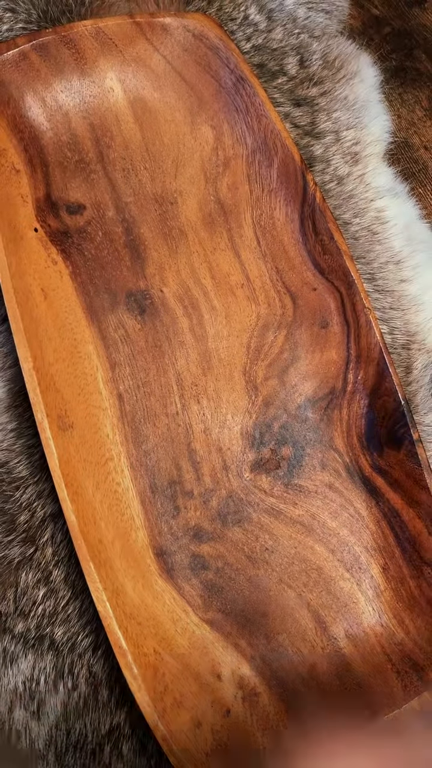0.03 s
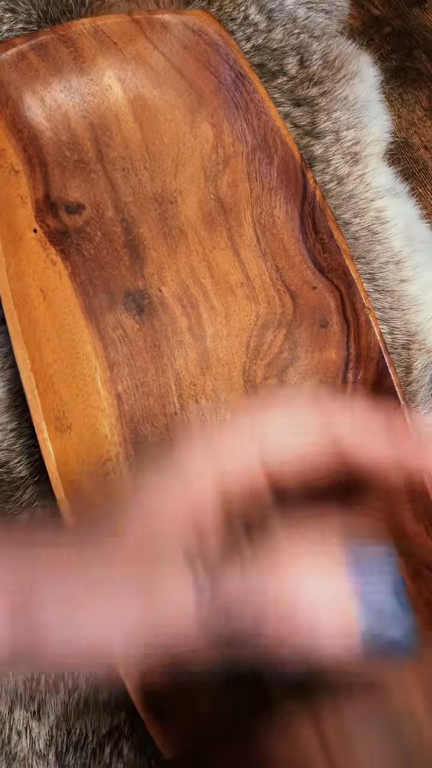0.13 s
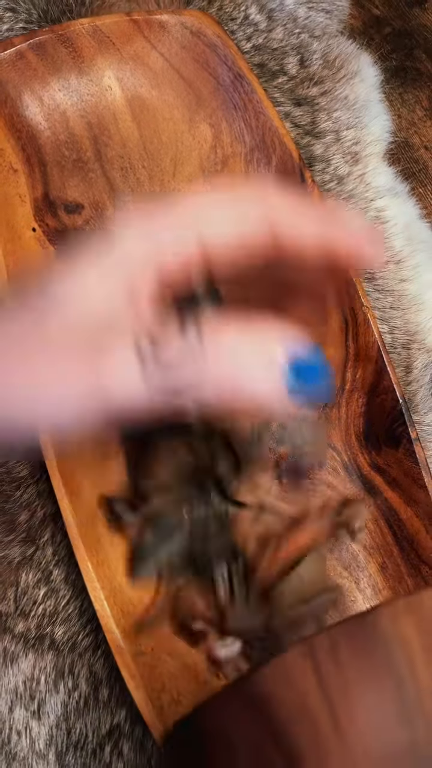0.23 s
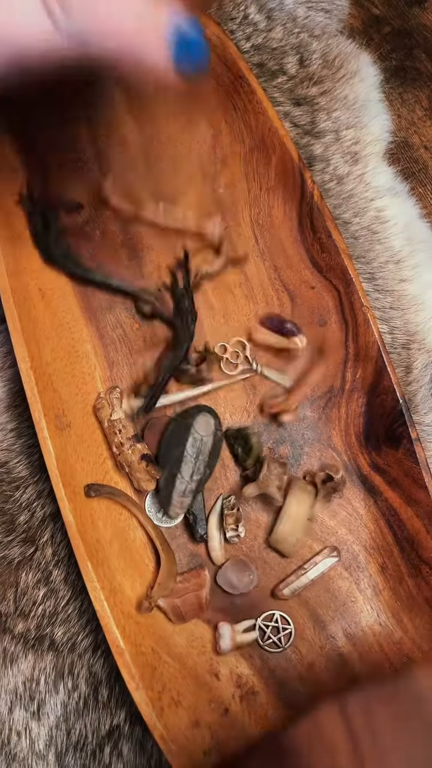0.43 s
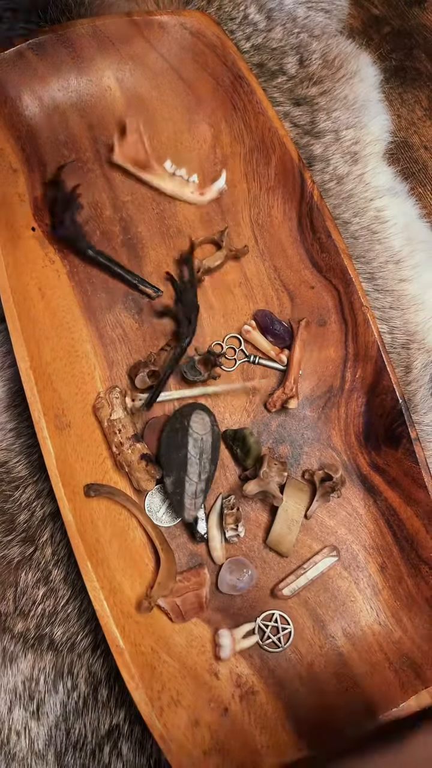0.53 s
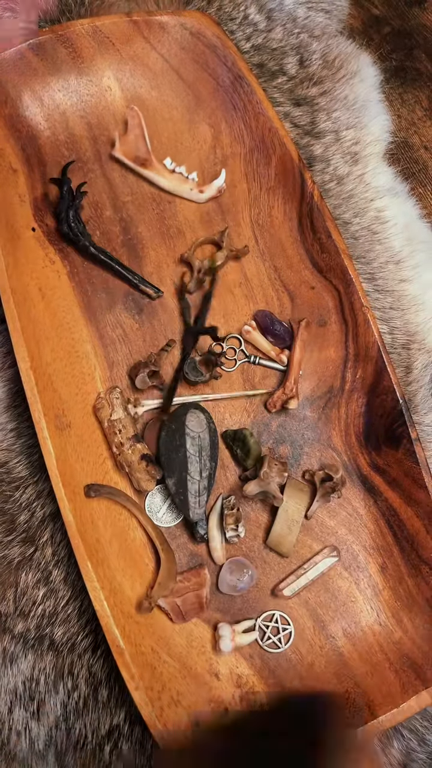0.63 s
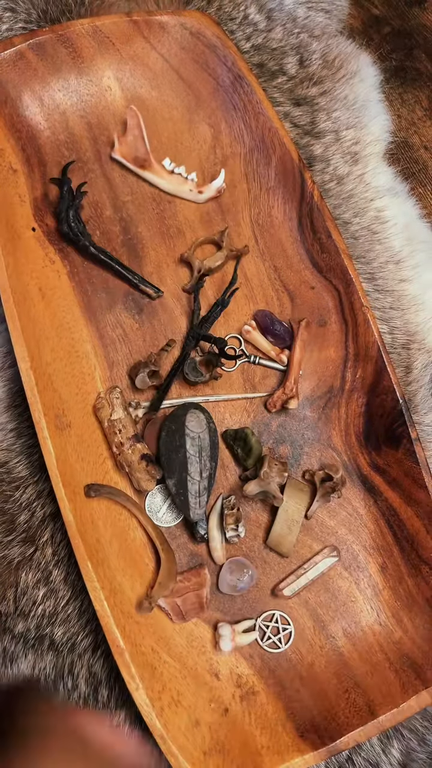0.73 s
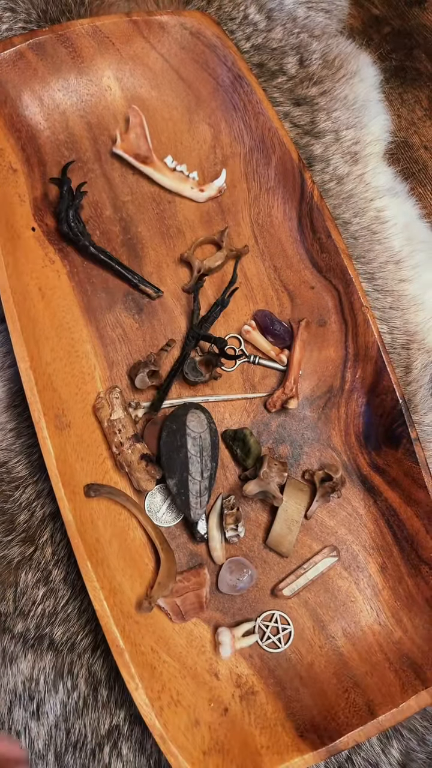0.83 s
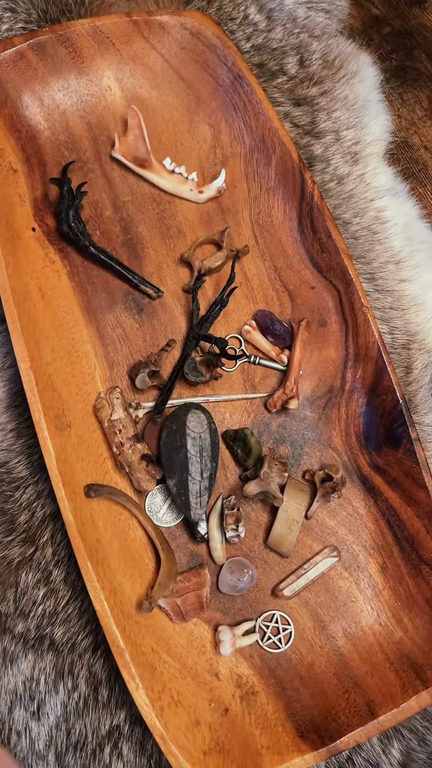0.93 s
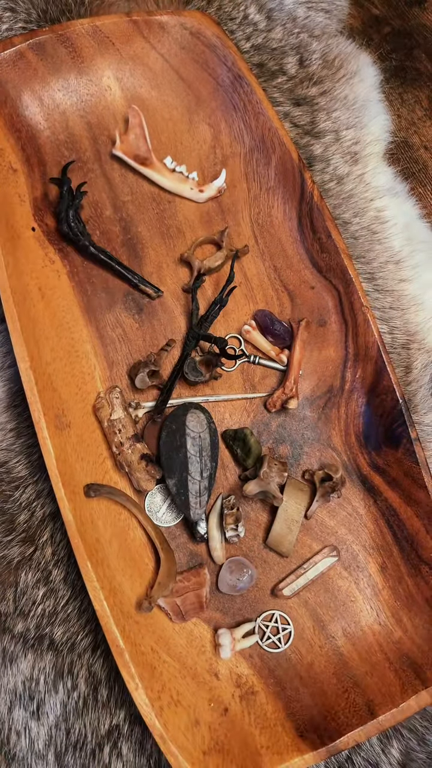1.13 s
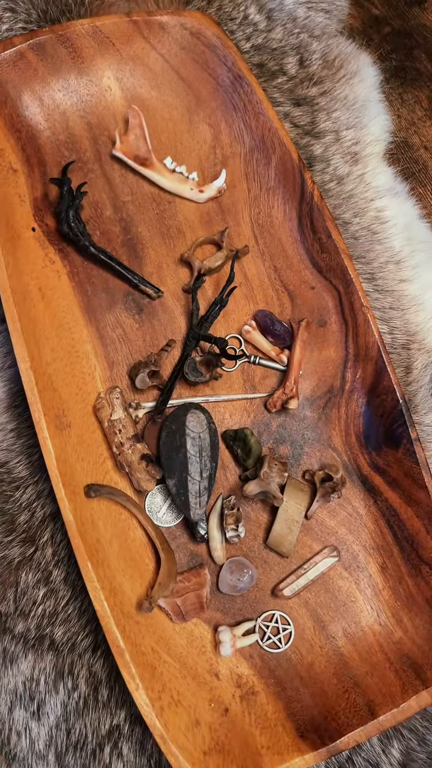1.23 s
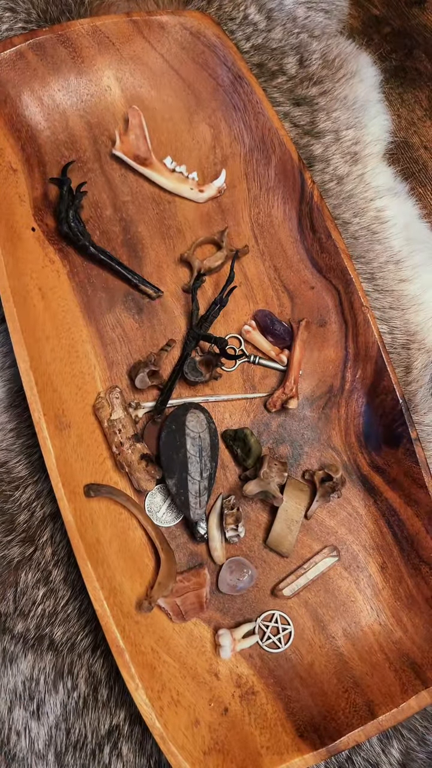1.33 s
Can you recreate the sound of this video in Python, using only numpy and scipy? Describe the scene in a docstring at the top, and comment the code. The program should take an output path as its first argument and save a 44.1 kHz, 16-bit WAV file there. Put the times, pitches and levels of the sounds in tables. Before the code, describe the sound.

Close up in a small room, a cupful of hard little pieces spills across wood with rattling clicks and a brief metallic chink, followed by a sharp cup knock, two softer knocks and a faint brush of fur.

```python
"""Small bones, stones and metal charms are tipped from a wooden cup onto a wooden tray, heard close by.
From 0.03 s pieces clack (damped tones, noise cracks); bounces rattle, metal chinks, the tray thuds low.
By 0.8 s they have thinned out. At 0.98 s the cup is set down hard (damped modes), then knocks softly.
After the landing, from 1.0 s, a hand brushes fur in uneven swells until the end (shaped noise).
A small room answers (noise tails); faint air noise throughout.
"""
import sys
import numpy as np
from scipy import signal
from scipy.fft import rfft, irfft, next_fast_len
from scipy.io import wavfile

SR = 44100
rng = np.random.default_rng(int(sys.argv[2]) if len(sys.argv) > 2 else 0)


def dump(signal):
    """Clip the signal to [-1, 1] and save it as 16-bit WAV at the path in sys.argv[1]."""
    limited = np.clip(np.atleast_2d(signal).T, -1, 1)
    pcm = np.round(limited * 32767).astype(np.int16)
    wavfile.write(sys.argv[1], SR, pcm)


N = 61739  # length [samples]


def amp(db):
    """Decibels to linear gain."""
    return 10 ** (np.asarray(db) / 20)


def unit(x):
    """Scale to rms 1."""
    return x / np.sqrt(np.mean(x ** 2) + 1e-20)


def along(points, hz):
    """Interpolate (frequency [Hz], value) points on a log frequency axis."""
    f, v = np.transpose(points)
    return np.interp(np.log(hz + 1), np.log(f + 1), v)


def level(rows):
    """Gain per sample of a (time [s], level [dB]) curve, -120 dB outside."""
    s, db = np.transpose(rows)
    return amp(np.interp(np.arange(N) / SR, s, db, -120, -120))


def filtered(x, response):
    """Multiply the spectrum of x by a response of frequency."""
    m = next_fast_len(N + 8192)
    hz = np.fft.rfftfreq(m, 1 / SR)
    return irfft(rfft(x, m) * response(hz), m)[..., :N]


def dulled(x, corner_hz):
    """Two-pole roll-off of the treble."""
    return filtered(x, lambda hz: 1 / (1 + 1j * hz / corner_hz) ** 2)


def noise(spectrum):
    """Coloured noise of rms 1."""
    return unit(filtered(rng.standard_normal(N), lambda hz: amp(along(spectrum, hz))))


def place(s, rows):
    """Sum short sounds, one per row, starting at times s."""
    start = np.round(np.asarray(s) * SR).astype(int)[:, None]
    at = start + np.arange(rows.shape[1])
    return np.bincount(at.ravel(), rows.ravel(), N + SR)[:N]


def rings(s, hz, db, t60, attack_s=0.00049, size=4096):
    """Damped sines: exponential decay, smooth exponential onset."""
    t = np.arange(size) / SR
    s, hz, db, t60 = [v.ravel()[:, None] for v in np.broadcast_arrays(s, hz, db, t60)]
    decay = amp(db - 60 * t / t60)
    onset = 1 - np.exp(-t / attack_s)
    return place(s[:, 0], decay * np.sin(2 * np.pi * hz * t) * onset)


def struck(s, db, modes, scatter_db, detune, damping=1, size=4096):
    """Each blow rings all modes anew, with random strengths and slight detuning."""
    hz, mode_db, t60 = np.transpose(modes)
    luck = rng.standard_normal((len(s), 2, len(hz)))
    blow_hz = hz * (1 + detune * luck[:, 0])
    blow_db = np.c_[db] + mode_db + scatter_db * luck[:, 1]
    return rings(np.c_[s], blow_hz, blow_db, t60 * damping, size=size)


# contact noise spectrum: (frequency [Hz], level [dB])
CRACK_COLOUR = [(300, -51), (900, -3), (2500, -5), (5000, -2.5), (8000, -7.5), (11000, -15), (14000, -17.5),
                (16000, -10)]


def cracks(s, db, t60):
    """Contact of hard surfaces: coloured noise bursts with exponential decay."""
    t = np.arange(1024) / SR
    envelope = place(s, amp(np.asarray(db)[:, None] - 60 * t / t60))
    burst = rng.standard_normal(N) * envelope
    return filtered(burst, lambda hz: amp(along(CRACK_COLOUR, hz)))


# single landings: (time [s], level [dB], dull tone [Hz], its level [dB re clack], bright tone [Hz],
# its level [dB re clack], crack level [dB re clack], ring time [factor])
CLACK_ROWS = [(0.033, -46.5, 1030, -19, 2060, -33, -12, 0.69), (0.139, -43.5, 850, 2, 2270, -13, -17, 0.77),
              (0.161, -18.5, 1680, -9.5, 2290, -5.5, -9.5, 0.67),
              (0.183, -38.5, 1010, 3.5, 2420, 11.5, -23.5, 0.62),
              (0.192, -45, 1070, -18, 2310, -13.5, -8.5, 0.9),
              (0.203, -25, 1000, -24, 2290, -9, -9.5, 0.42), (0.216, -4, 1360, -38, 2310, -13.5, -12.5, 1),
              (0.23, -7.5, 1140, -22, 2490, -19, -36, 1), (0.247, 2.5, 1080, -41, 3600, -18, -21.5, 1),
              (0.25, -1.5, 910, -34, 3240, -31, -12.5, 1), (0.258, -1, 1560, -40, 2300, -8, -13, 1),
              (0.268, 0.5, 1430, -18, 2356, -7.5, -30.5, 1), (0.272, -1, 1420, -44, 2290, -11.5, -28, 0.81),
              (0.28, -7, 1500, -43, 3330, -18.5, -15, 1), (0.286, 0, 1330, -27, 3120, -10.5, -29, 1),
              (0.294, -6.5, 1850, -17, 2420, -10.5, -13.5, 0.94),
              (0.313, -8, 1870, -30, 3200, -18.5, -8, 0.72), (0.319, -18.5, 1930, -18, 2260, -2, -18, 0.8),
              (0.33, -8.5, 1500, -37, 3370, -17.5, -6.5, 0.52),
              (0.34, -9.5, 1372, -44, 3330, -9.5, -10.5, 1), (0.353, -6.5, 1430, -35, 2224, -4.5, -13, 0.9),
              (0.367, -13.5, 1680, -36, 2226, -2, -23, 0.76), (0.376, -12, 927, -6.5, 3160, -7, -32, 1),
              (0.384, -17.5, 802, -9, 2990, -1, -30, 1), (0.4, -8.5, 960, -17, 2150, -27, -28.5, 1),
              (0.412, -19.5, 1285, 6, 3500, 5, -14, 0.48), (0.42, -17.5, 1627, 1.5, 3300, 3, -23, 0.79),
              (0.434, -6, 983, -11, 3430, -10.5, -16.5, 0.94), (0.445, -10.5, 1490, -16, 2710, -13, -26, 1),
              (0.45, -25, 776, -4, 2390, -16, -19.5, 0.9), (0.475, -11, 853, -9.5, 3480, -13.5, -29.5, 1),
              (0.486, -17, 1614, -1.5, 2330, -11.5, -24, 1), (0.497, -3.5, 1610, -12.5, 2350, -34, -18, 1),
              (0.511, -11.5, 1580, -12, 3360, -32, -3.5, 0.73),
              (0.52, -13.5, 1700, -6, 2170, -31, -25.5, 1), (0.546, -20, 1440, -7.5, 2320, -4.5, 1, 1),
              (0.561, -16.5, 1560, -7.5, 2170, -7, -16.5, 1),
              (0.579, -21, 1740, -31, 2460, -1, -16.5, 0.72), (0.594, -28, 1610, 4.5, 2380, 5.5, -1, 0.84),
              (0.598, -17, 1750, -7.5, 2290, -13.5, -25, 1),
              (0.608, -12.5, 1735, -6.5, 2530, -12.5, -18, 0.49),
              (0.63, -22, 1540, -9, 2290, -8.5, -4.5, 0.9), (0.657, -5.5, 1730, -9.5, 2310, -14, -32, 0.97),
              (0.664, -17.5, 1940, -5, 2460, -2.5, -12.5, 0.42),
              (0.683, -33, 1630, -26.5, 2390, -20, -22, 0.51),
              (0.704, -12, 1590, -12, 3400, -18, -27.5, 0.85),
              (0.719, -12.5, 1160, -1, 2240, -20, -25, 0.3), (0.725, -19, 1150, -13, 2450, -9, -42, 0.78),
              (0.733, -27.5, 1270, -1.5, 2410, -19, -15.5, 0.9),
              (0.798, -37.5, 1730, -2, 2200, -2, -28.5, 0.96),
              (0.818, -34.5, 1730, -9, 2060, -15, -38.5, 1), (0.914, -48.5, 856, 0, 2570, -12, -12.5, 0.63),
              (1.154, -28, 791, 0, 3950, -10.5, -12, 0.55), (1.18, -30.5, 1510, 0.5, 3610, -5, -40, 0.57)]
# modes of tray and pieces, before scatter and damping: (frequency [Hz], level [dB], t60 [s])
WOOD_MODES = [(248.6, -25, 0.048), (428, -10.5, 0.017), (545, -15.5, 0.023), (872, -13, 0.052),
              (1420, -5, 0.028), (1730, -9, 0.048), (2290, 1, 0.04), (3143, 1.5, .03), (3395, 0.5, 0.023),
              (4080, -2.5, 0.034), (5290, 2.5, 0.0092), (6640, -11.5, 0.036), (8230, -9.5, 0.03),
              (10030, -10.5, .008)]
DULL_T60_S, BRIGHT_T60_S, WOOD_DB = .025, 0.039, -17  # t60s before the ring factor
CRACK_T60_S = 0.056
SNAP_T60_S, SNAP_DB = .004, -4  # sharp first contact
BODY_T60_S, BODY_DB, BODY_HZ = .022, -11, 2560  # dull woody burst


def clacks():
    """Single pieces landing: two tones of their own, wood modes, crack, snap and dull body noise."""
    s, db, dull_hz, dull_db, bright_hz, bright_db, crack_db, ring = np.transpose(CLACK_ROWS)
    dull = rings(s, dull_hz, db + dull_db, DULL_T60_S * ring)
    bright = rings(s, bright_hz, db + bright_db, BRIGHT_T60_S * ring)
    crack = cracks(s, db + crack_db, CRACK_T60_S)
    snap = cracks(s, db + SNAP_DB, SNAP_T60_S)
    body = dulled(cracks(s, db + BODY_DB, BODY_T60_S), BODY_HZ)
    wood = struck(s, db + WOOD_DB, WOOD_MODES, scatter_db=3, detune=.05, damping=np.c_[ring])
    return dull + bright + wood + crack + snap + body


# small bounces: (time [s], level [dB])
RATTLE_LEVEL = [(0.13, -67.5), (0.208, -36.5), (0.252, -27), (0.33, -20.5), (0.388, -26), (0.468, -31),
                (0.548, -32), (0.588, -30), (0.722, -48), (0.788, -61), (0.86, -65.5)]
RATTLE_PER_S, RATTLE_SPREAD_DB = 600, 2
RATTLE_CRACK_DB, TICK_T60_S, RATTLE_DAMPING = -1.5, .016, 0.79  # damping: factor on wood t60


def rattle():
    """Small dry bounces at random exponential gaps: wood modes plus crisp noise ticks."""
    luck = rng.exponential(size=(800, 2))
    s = RATTLE_LEVEL[0][0] + np.cumsum(luck[:, 0]) / RATTLE_PER_S
    keep = s < N / SR
    s, db = s[keep], RATTLE_SPREAD_DB * luck[keep, 1]
    tones = struck(s, db, WOOD_MODES, scatter_db=4.5, detune=.06, damping=RATTLE_DAMPING, size=768)
    ticks = unit(cracks(s, db, TICK_T60_S))
    return level(RATTLE_LEVEL) * unit(unit(tones) + amp(RATTLE_CRACK_DB) * ticks)


# tiny metal parts: (time [s], level [dB])
JINGLE_LEVEL = [(0.155, -55.5), (0.161, -45), (0.191, -50.5), (0.235, -43.5), (0.275, -17), (0.287, -30.5),
                (0.299, -13), (0.333, -20), (0.341, -31), (0.42, -54)]
JINGLE_PER_S, JINGLE_T60_S, JINGLE_SPREAD_DB = 1500, 0.013, 8
JINGLE_LOW_HZ, JINGLE_HIGH_HZ = 13450, 15200


def jingle():
    """Key, coin and rings chink: dense, very high damped sines at random moments."""
    luck = rng.random((3000, 3))
    gaps = -np.log(luck[:, 2]) / JINGLE_PER_S
    s = JINGLE_LEVEL[0][0] + np.cumsum(gaps)
    keep = s < N / SR
    hz = JINGLE_LOW_HZ + (JINGLE_HIGH_HZ - JINGLE_LOW_HZ) * luck[keep, 0]
    db = JINGLE_SPREAD_DB * luck[keep, 1]
    chinks = rings(s[keep], hz, db, JINGLE_T60_S, attack_s=0.0004, size=1024)
    return level(JINGLE_LEVEL) * unit(chinks)


# heavy landings: (time [s], level [dB])
THUD_ROWS = [(.25, -26), (.268, -15.5), (.33, -28)]
# flexing modes of the tray on its fur bed: (frequency [Hz], level [dB], t60 [s])
THUD_MODES = [(48.2, -19, 0.058), (92, 0, 0.087), (322, -9.5, .04)]


def thuds():
    """Tray flexes on its fur bed under the heaviest stones: low modes with a slow onset."""
    s, db = np.transpose(THUD_ROWS)
    hz, mode_db, t60 = np.transpose(THUD_MODES)
    return rings(np.c_[s], hz, np.c_[db] + mode_db, t60, attack_s=0.0069, size=8192)


# modes of the empty cup, before scatter, grip and low cut: (frequency [Hz], level [dB], t60 [s])
CUP_MODES = [(240, -19, .03), (398, -9, 0.041), (607, 3.5, 0.01), (838, -5, 0.069), (926, 7.5, 0.016),
             (1152, -5, 0.051), (1540, 0, 0.023), (1623, -5.5, 0.032), (2010, -5.5, 0.049),
             (2310, -2, 0.056), (2757, -5.5, 0.039), (3250, -16, 0.033), (3860, 0, 0.041),
             (5610, -15, 0.031), (5750, -15, .012), (6500, -27, 0.016)]
CUP_S, CUP_DB = .9778, -9
CUP_AGAIN_S, CUP_AGAIN_DB = .0035, -9  # far edge of the foot: delay, level re first edge
CUP_FREE_S, CUP_GRIP_T60_S = 0.0091, 0.029  # rings freely, then the hand damps it
CUP_CRACK_DB, CUP_CRACK_T60_S, CUP_CRACK_HZ = 1.5, 0.033, 5000  # level re cup
CUP_LOW_CUT_HZ = 130  # removes the low-frequency thump of the summed sine onsets


def cup_down():
    """Cup foot lands edge after edge: modes ring, the hand damps them; a dulled crack on top."""
    s, db = [CUP_S, CUP_S + CUP_AGAIN_S], [CUP_DB, CUP_DB + CUP_AGAIN_DB]
    ring = struck(s, db, CUP_MODES, scatter_db=1, detune=.005)
    gripped_s = np.clip(np.arange(N) / SR - CUP_S - CUP_FREE_S, 0, 1)
    ring = ring * amp(-60 * gripped_s / CUP_GRIP_T60_S)
    crack = dulled(cracks([CUP_S], [CUP_DB + CUP_CRACK_DB], CUP_CRACK_T60_S), CUP_CRACK_HZ)
    ring = filtered(ring, lambda hz: (1j * hz / (CUP_LOW_CUT_HZ + 1j * hz)) ** 2)
    return ring + crack


# soft knocks of the cup: (time [s], level [dB], reference frequency [Hz])
ROCK_ROWS = [(1.159, -12.5, 695), (1.228, -12, 623), (1.391, -38, 600)]
# further partials, below and above the main one: (ratio to reference frequency [factor], level [dB])
ROCK_PARTIALS = [(.55, -12.5), (1.6, -11), (3.6, -16.5)]
ROCK_T60_S, ROCK_ATTACK_S = 0.026, 0.0019  # t60 at ratio 1


def cup_rocks():
    """Cup rocks and knocks softly: few partials, higher ones dying sooner."""
    s, db, hz = np.transpose(ROCK_ROWS)
    ratio, partial_db = np.transpose([(0.99, 0.0041)] + ROCK_PARTIALS)  # main partial first
    t60 = ROCK_T60_S / np.sqrt(ratio)
    return rings(np.c_[s], np.c_[hz] * ratio, np.c_[db] + partial_db, t60, attack_s=ROCK_ATTACK_S)


# fur brushing: (time [s], level [dB])
RUSTLE_LEVEL = [(1.0, -61), (1.058, -54), (1.092, -47.5), (1.144, -60.5), (1.154, -60), (1.17, -58),
                (1.23, -48), (1.246, -55), (1.378, -63), (1.4, -71)]
# fur noise spectrum: (frequency [Hz], level [dB])
RUSTLE_SPECTRUM = [(1760, -4), (3000, -2.5), (4900, -3.5), (5560, -9), (7350, -17), (8000, -7.5),
                   (16000, -27)]


def rustle():
    """Fur brushed by the hand: coloured noise under a level curve."""
    return level(RUSTLE_LEVEL) * noise(RUSTLE_SPECTRUM)


# reverberation time: (frequency [Hz], t60 [s])
ROOM_T60 = [(200, 0.22), (800, .4), (2500, 0.23), (6000, .2), (14000, 0.058)]
# room spectrum: (frequency [Hz], level [dB])
ROOM_SPECTRUM = [(150, 1), (800, -2.5), (2500, 0.5), (4000, -3.5), (9000, 1.5), (15000, 3)]
ROOM_DB, ROOM_DELAY_S, ROOM_RISE_S = -15, .006, 0.0052


def room(x):
    """Convolve with a delayed noise tail of unit energy; each frequency dies at its own speed."""
    hz, t, z = signal.stft(rng.standard_normal(SR // 2), SR, nperseg=256)
    colour_db = along(ROOM_SPECTRUM, hz)[:, None]
    decay_db = -60 * t / along(ROOM_T60, hz)[:, None]
    rise = 1 - np.exp(-t / ROOM_RISE_S)
    tail = signal.istft(z * amp(colour_db + decay_db) * rise, SR, nperseg=256)[1]
    delayed = np.pad(x, (round(ROOM_DELAY_S * SR), 0))
    return signal.fftconvolve(delayed, tail / np.linalg.norm(tail))[:N]


def room_in_stretches(x, count):
    """Each equal stretch of time gets a fresh noise tail, so no single tail colours the whole answer."""
    stretch = np.arange(N) * count // N
    return sum(room(x * (stretch == k)) for k in range(count))


# background spectrum: (frequency [Hz], level [dB])
AIR_SPECTRUM = [(15, -41), (25, -9.5), (102, -5), (206, 3.5), (373, -8.5), (560, -6.5), (775, -14.5),
                (840, -15.5), (1740, -17), (14000, -42.5), (16000, -41)]
AIR_DB = -55


def air():
    """Steady background: coloured noise."""
    return amp(AIR_DB) * noise(AIR_SPECTRUM)


# stereo width: (frequency [Hz], side over mid [dB])
SIDE_OVER_MID = [(2000, -95.5), (3400, -65.5), (5000, -49), (9000, -34.5), (12000, -1.5), (14000, -29)]


def widened(mid):
    """Side signal: mid smeared by a short noise burst, then filtered; added left, subtracted right."""
    scatter = rng.standard_normal(256)
    smeared = np.convolve(mid, scatter / np.linalg.norm(scatter))[:N]
    side = filtered(smeared, lambda hz: amp(along(SIDE_OVER_MID, hz)))
    return np.array([mid + side, mid - side])


def scene():
    """Near sources, their room answer, rustle and air, in stereo."""
    near = clacks() + rattle() + jingle() + thuds() + cup_down() + cup_rocks()
    answer = amp(ROOM_DB) * room_in_stretches(near, count=20)
    return widened(near + answer + rustle() + air())


CEILING, TOP_HZ = .93, 15900  # ceiling [full scale], before the band limit


def record(dry):
    """Soft ceiling, then a sharp band limit."""
    soft = dry / (1 + np.abs(dry / CEILING) ** 4) ** (1 / 4)
    return filtered(soft, lambda hz: hz < TOP_HZ)


dry = scene()
out = record(dry)
dump(out)
```